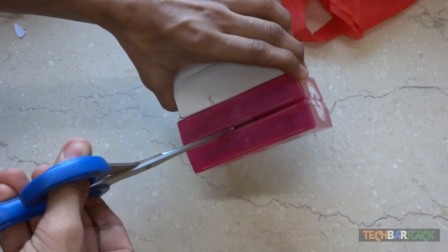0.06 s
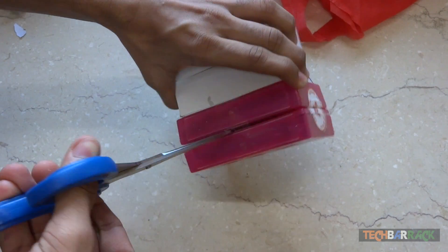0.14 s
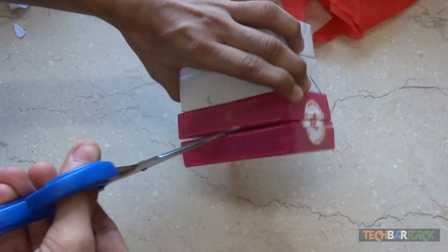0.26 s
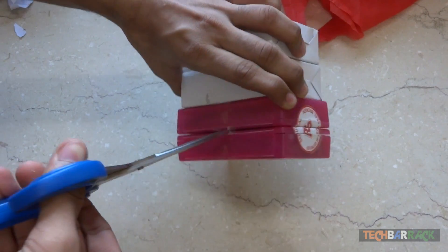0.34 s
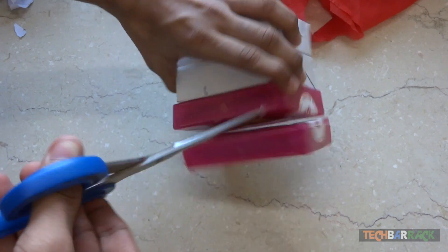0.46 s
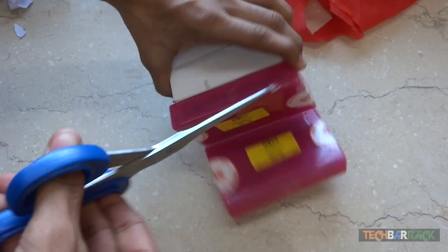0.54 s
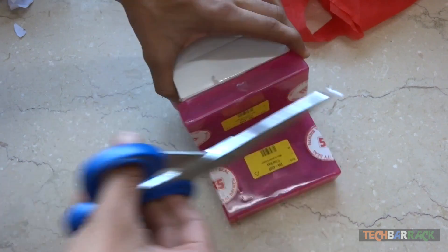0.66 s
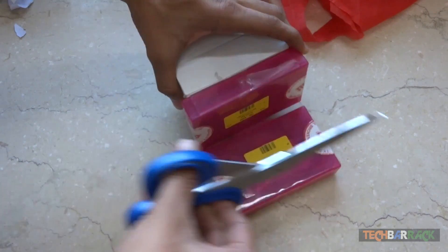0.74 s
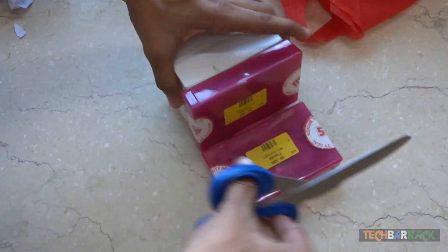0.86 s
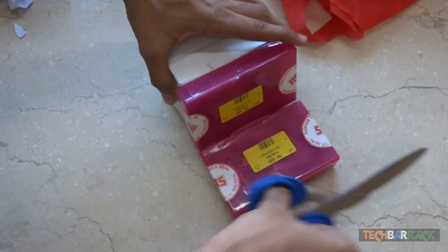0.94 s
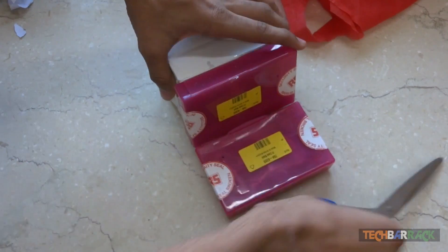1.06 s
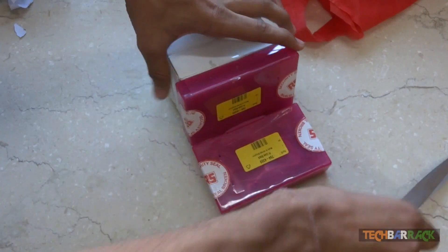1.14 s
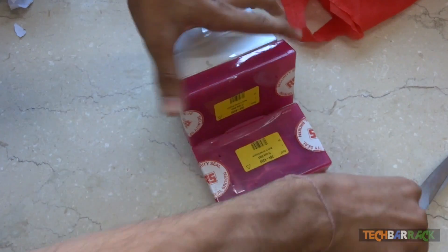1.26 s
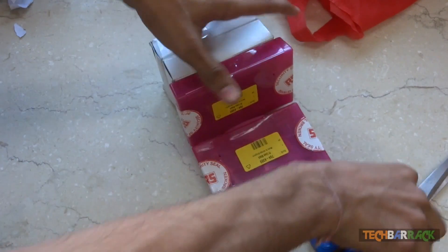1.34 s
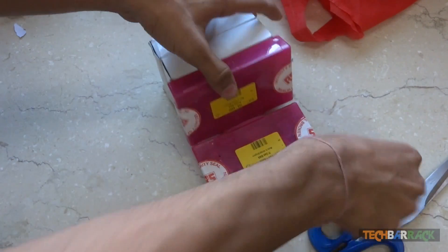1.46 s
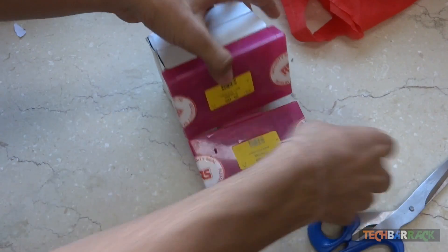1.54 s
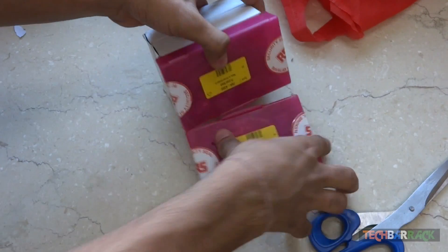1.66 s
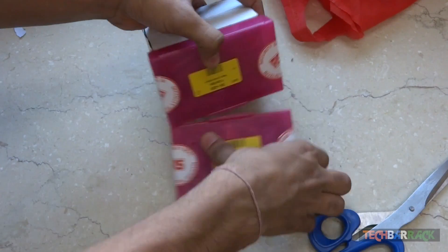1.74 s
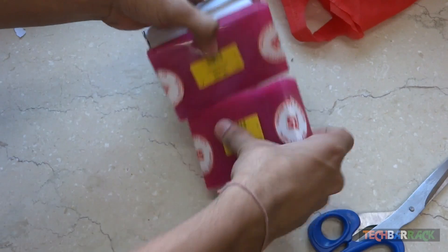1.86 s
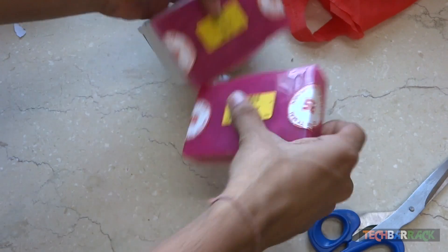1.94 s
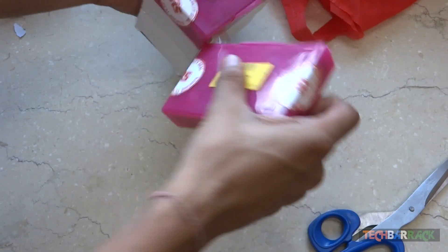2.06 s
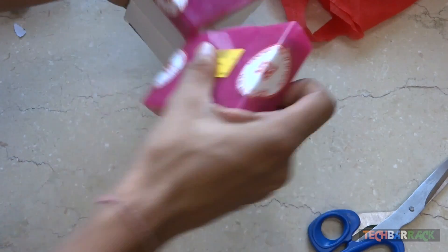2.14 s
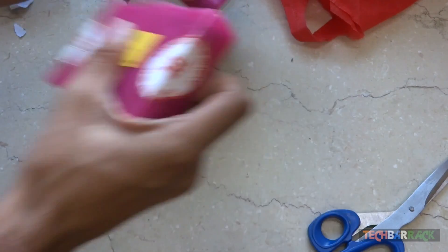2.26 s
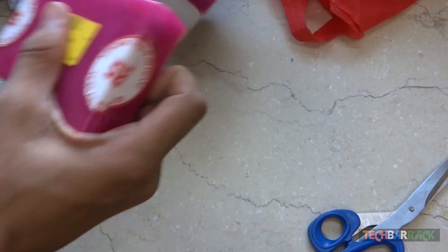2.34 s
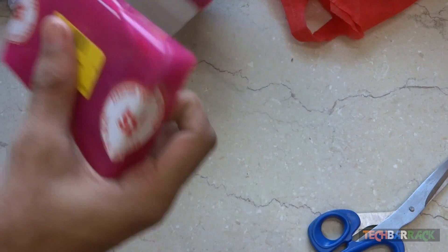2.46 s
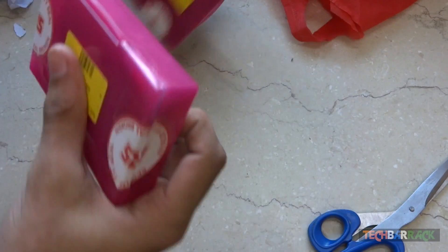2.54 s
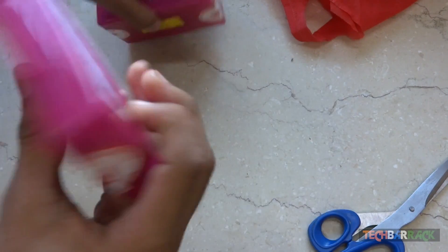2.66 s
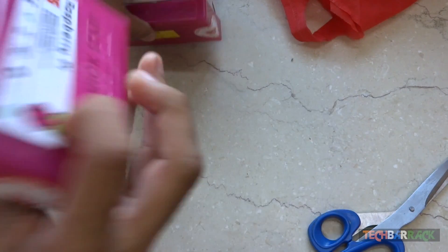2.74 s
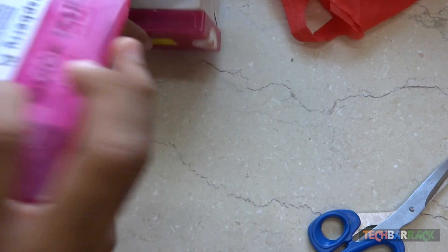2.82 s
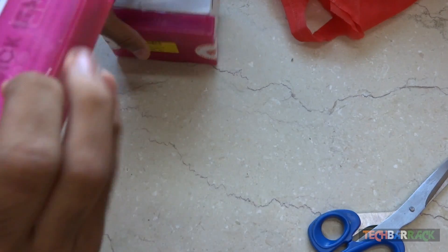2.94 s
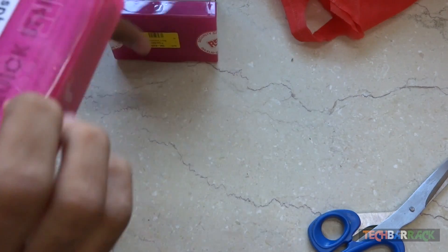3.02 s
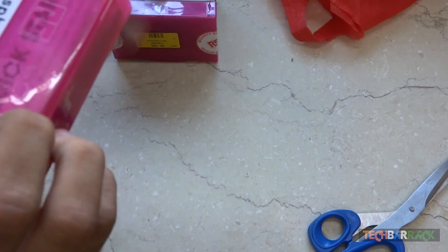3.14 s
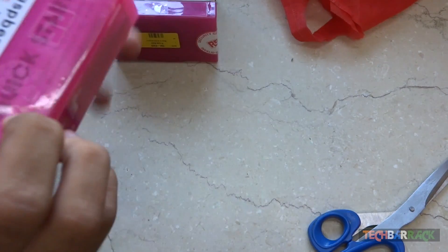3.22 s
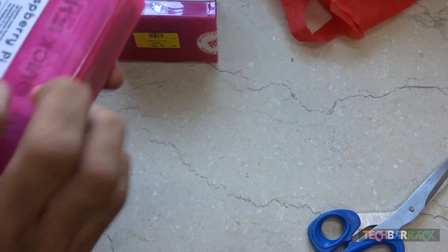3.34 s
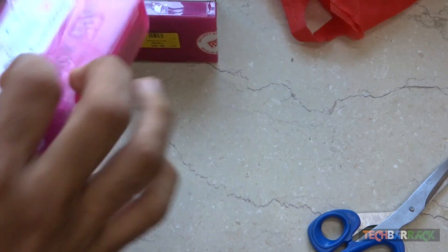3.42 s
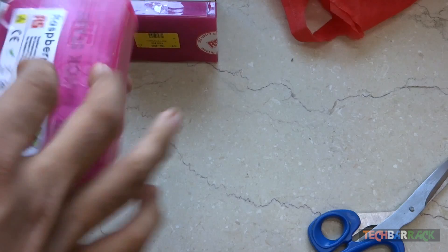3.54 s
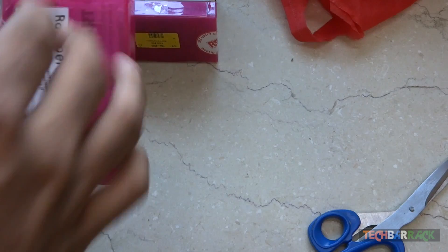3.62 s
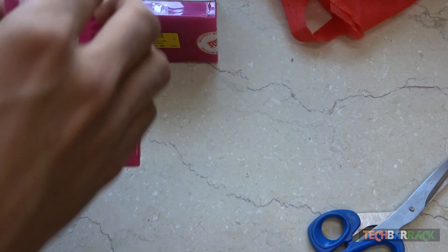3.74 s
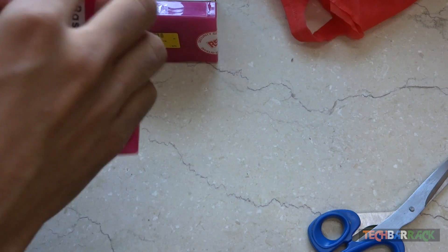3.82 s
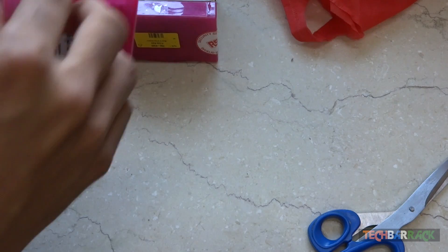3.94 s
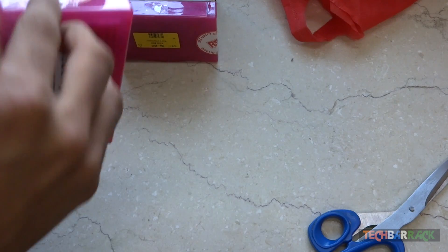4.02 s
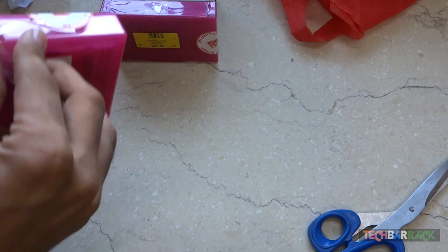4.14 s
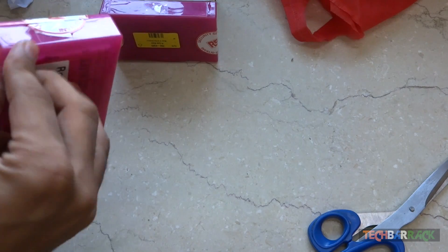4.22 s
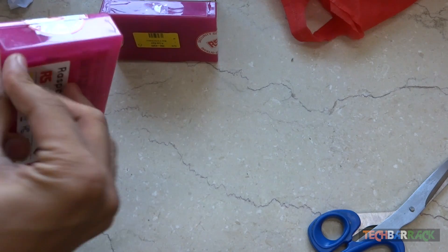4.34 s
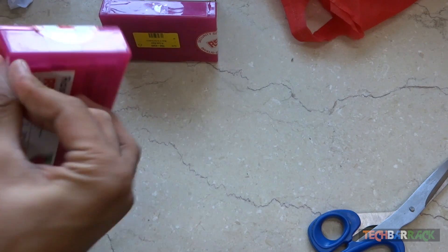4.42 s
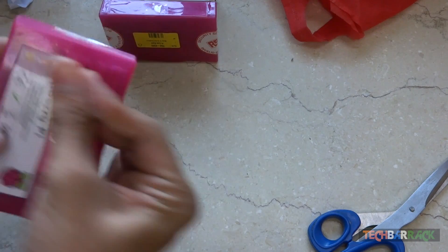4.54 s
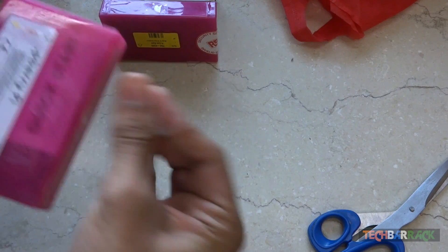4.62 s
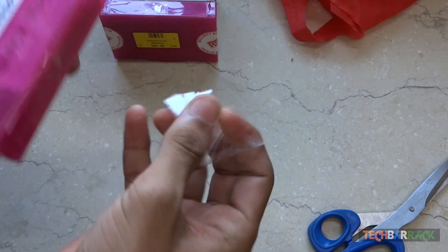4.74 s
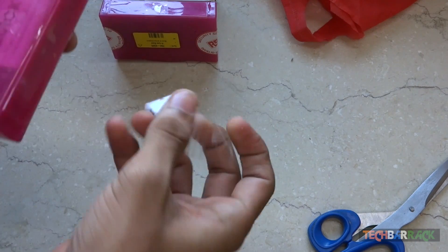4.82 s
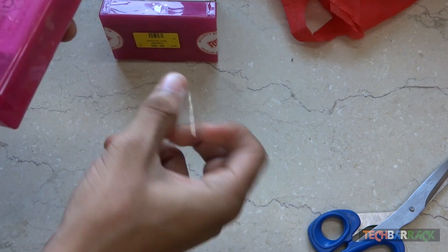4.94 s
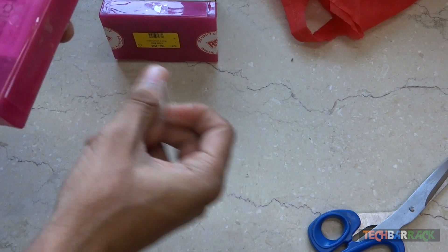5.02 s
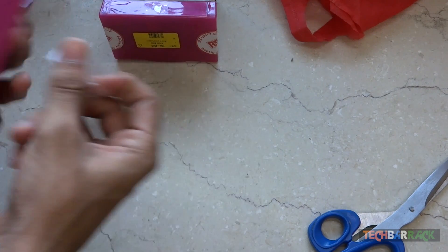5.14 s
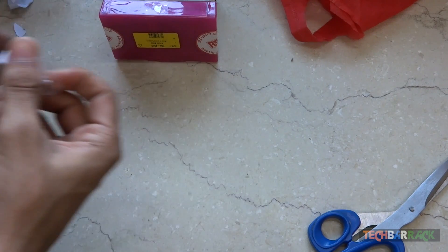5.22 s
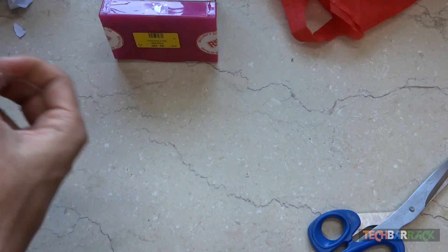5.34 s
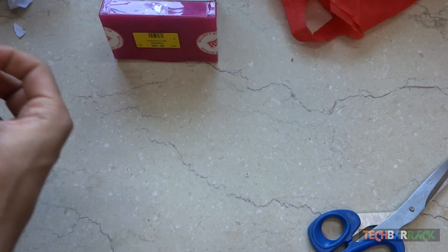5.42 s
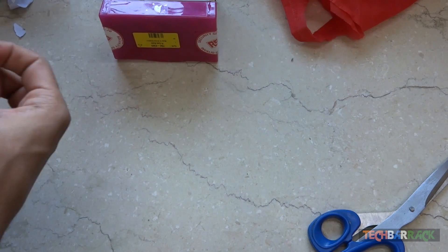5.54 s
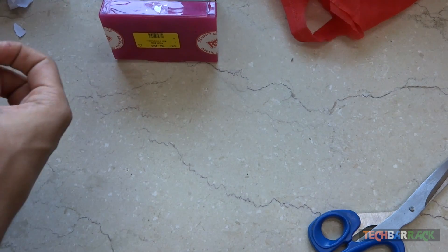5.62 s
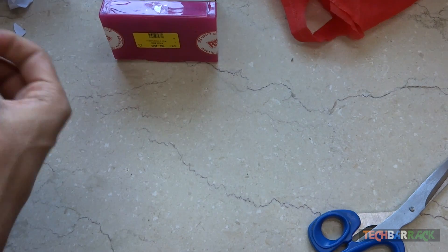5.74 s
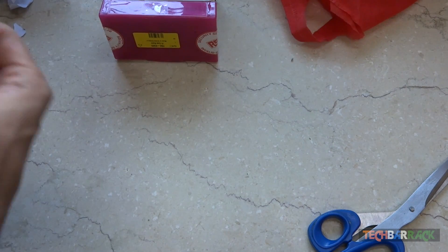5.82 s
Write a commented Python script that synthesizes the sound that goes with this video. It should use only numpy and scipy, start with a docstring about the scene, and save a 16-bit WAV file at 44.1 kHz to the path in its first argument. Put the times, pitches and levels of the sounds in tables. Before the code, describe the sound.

Light clicks and crinkles open as scissors work into tape joining two small plastic-wrapped boxes. At about 0.6 seconds the tape tears loudly, with sharp cracks and a soft thud. The scissor handles clack onto a stone floor at 1.1 seconds, and the blades skid with a short steel ring around 1.4. The boxes pull apart in two loud crackling rips at 2.0 and 2.2 seconds. Hollow knocks and sharp cracks follow between 2.7 and 3.1 as one box is set down. After a quieter moment, a sticker is picked from about 3.9 seconds, its glue releasing in a fine, soft crackle, and it rips free at 4.5. Small ticks and crinkles continue until nearly 5.9. The handling is centred in stereo, later slightly left. A small bare room adds a short echo, with a faint rough hum throughout.

```python
"""Scissors slit the tape joining two small film-wrapped boxes on a stone floor, then are laid down.
Tape and film tear in dense clicks and single cracks that knock on the hollow boxes; the steel rings as
it skids. The boxes are pulled apart, one is set down, and a sticker is picked and peeled off the other,
its glue letting go in tiny slips. On the stereo microphone the hands are central, later a little left;
a small bare room answers every crack, and a rough hum lies behind it all."""
import sys
import numpy as np
from scipy import signal
from scipy.fft import rfft, irfft
from scipy.io import wavfile

SR = 44100
rng = np.random.default_rng(int(sys.argv[2]) if len(sys.argv) > 2 else 0)


def put_to_file(sound):
    """Save the sound as 16-bit audio at rate SR, in the file named by the first command-line argument."""
    columns = np.atleast_2d(sound).T  # one column per channel
    safe = np.clip(columns, -1, 1)
    whole_steps = np.round(safe * 32767)
    wavfile.write(sys.argv[1], SR, whole_steps.astype(np.int16))


N = 258942

# spectra of the hum and of the wrapping film: f/Hz, level/dB
HUM_SPECTRUM = [(15, -85.5), (25, -53), (53, -35), (130, -17), (285, -23.5), (335, -22), (384, -9.5),
                (476, -20), (560, -11), (677, -12), (818, -1.5), (1040, -14.5), (1440, -21), (11600, -35.5),
                (16000, -37.5)]
FILM_SPECTRUM = [(710, -6), (1160, 7.5), (1430, 0.5), (2560, -5), (2760, -1.5), (3870, -4), (8910, 2.5),
                 (13600, -0.5), (16000, -10)]
# stereo width of hum and room: f/Hz, side against mid/dB
HUM_WIDTH = [(60, -22), (150, -13), (380, -5), (950, -10.5), (2380, 0.5), (5980, -13.5), (15000, -45.5)]
ROOM_WIDTH = [(60, -23), (200, -2), (600, -11.5), (1600, -7.5), (5000, -31.5), (15000, -57.5)]
# reverberation time of the room: f/Hz, T60/s
ROOM_DECAY = [(100, 0.079), (1000, 0.23), (5000, 0.21), (16000, 0.21)]
# course of the hum and of the low rumble: t/s, level/dB
HUM_COURSE = [(0.0, -51.5), (0.8, -49), (1.6, -49), (2.16, -54), (2.68, -55), (2.97, -50), (3.6, -53.5),
              (4.2, -51.5), (5.87, -50)]
RUMBLE_COURSE = [(0.0, -58.5), (1.9, -60), (2.05, -85.5), (2.7, -83.5), (2.8, -67), (3.6, -66.5),
                 (5.87, -61)]
# balance at the microphone, following the hands: t/s, left minus right/dB
BALANCE = [(0.0, 0.1), (3.2, 0), (3.998, 2.2), (4.8, 0.6), (5.87, 2)]
# thuds carried by the floor: t/s, rise/s, hold/s, level/dB
FLOOR_THUDS = [(0.295, 0.085, .01, -48.5), (0.636, 0.019, 0.12, -34), (1.114, .02, 0.034, -47),
               (1.38, 0.072, 0.14, -45), (1.845, .09, .005, -61), (2.735, 0.024, .003, -46.5),
               (2.911, 0.021, 0.0088, -45.5), (3.038, 0.018, 0.071, -42.5), (5.204, 0.15, .02, -53)]
# faint wavering tones: f/Hz, level/dB, start/s, end/s
THIN_TONES = [(400, -49, 0.956, 1.095), (2750, -54.5, 0.967, 1.112), (3220, -51, 0.963, 1.11),
              (3521, -53, 0.954, 1.107), (3200, -69, 3.249, 3.326), (2765, -66, 3.227, 3.47)]
# resonances: f/Hz, width/Hz, level/dB
BLADE_MODES = [(2050, 85, -4.5), (3700, 36, -2), (3890, 91, -1), (4770, 120, 1.5), (5880, 160, -6.5),
               (6600, 40, -9), (6950, 23, -8), (7210, 140, 4.5), (8770, 100, -15), (10650, 87, -9.5),
               (10500, 67, -4), (11700, 80, 2.5), (12000, 49, -8), (12600, 120, -4.5)]
HANDLE_MODES = [(2310, 110, -3.5), (3650, 95, 3), (4090, 66, 0), (5080, 94, -8), (6400, 130, -7),
                (7280, 90, 4), (8700, 52, -4), (11100, 160, -1), (12800, 80, -5.5)]
STICKER_MODES = [(1730, 130, 10), (2680, 160, 12), (3460, 460, 5.5), (5370, 1800, 9.5)]
TAUT_STRIP_MODES = [(2300, 180, 9.5), (4360, 350, 12), (6940, 3100, -14)]
# hollow bodies, the box and its panel under the sticker: f/Hz, width before widening/Hz, level/dB
BOX_MODES = [(398, 118, -4.5), (563.6, 36.5, 8), (713, 107, -1), (899, 33.3, 5.5), (925.4, 20, 7.5),
             (1106, 297, 0)]
PANEL_MODES = [(1110, 75, 10), (527, 330, 2)]
# strokes: t/s, rise/s, hold/s, level/dB, dull/dB, treble/dB, box/dB
# level is that of the middle range before the mix; dull, treble and box are relative to it
TEARS = [(0.0, 0.00076, .001, -47, -5.5, 8, -3), (0.636, 0.0046, 0.07, -22, 4, 1, 2),
         (0.726, 0.0013, 0.011, -24.5, 1.5, -1.5, 1), (0.943, 0.0021, 0.04, -44.5, 2.5, -5, -1),
         (1.864, 0.0022, .07, -45.5, 3, 5.5, 0), (1.986, 0.0042, 0.1, -19, -0.5, 2, -11.5),
         (2.203, 0.016, 0.066, -21.5, 0, 8.5, -18.5), (2.749, 0.00092, .003, -39, -4, -15.5, 12.5),
         (2.928, 0.0015, .01, -46.5, -8, 0, 18.5), (3.047, 0.0016, .008, -26.5, 4, -4, 8),
         (3.855, 0.0017, .002, -57, -13, -9.5, 9), (4.506, 0.0052, .018, -51.5, -9, -5, 9)]   # tape and film tearing, box landing
FILM_RUSTLES = [(0.34, .038, .003, -39.5, -23, 0.5, 7), (0.41, .03, 0.02, -55, -6, 10, 9.5),
                (1.03, 0.017, 0.044, -54.5, 9.5, -6, -8), (1.62, 0.17, 0.01, -48, 4, -4, -6),
                (1.825, .01, 0.028, -60, 7, 16, -10), (1.95, .035, .003, -40.5, -8, 14, -7),
                (2.15, 0.054, .003, -34.5, -4, 8, -12), (2.95, 0.026, 0.2, -50.5, -0.5, -12, -6),
                (3.53, .03, .03, -64.5, 10, 4, 4), (4.35, .02, 0.054, -58, 12, 9, 17.5),
                (4.44, 0.083, .003, -55.5, 13, 19, 15), (4.73, 0.0086, 0.0043, -40, -18, -4, -30),
                (5.19, 0.021, .003, -51, 2, 0, 9), (5.245, 0.011, 0.0064, -44, 1, 3, -7),
                (5.265, 0.011, 0.13, -61.5, 12, 7.5, 13.5), (5.518, .004, 0.047, -54, -5, 7, 2),
                (5.62, 0.0035, 0.024, -57, -3, -1, 7)]
HANDLE_TOUCH = [(1.116, 0.00069, 0.071, -33.5, 8, 9, -1)]
BLADE_SKID = [(1.383, 0.0044, 0.13, -19, -4, 1, -6)]
STICKER_RIP = [(4.543, 0.015, .05, -22, 0.4, 6.3, -11.5)]
# glue letting go: the stroke columns, then slip rate/Hz, share of distinct slips/0-1
GLUE_PEEL = [(4.005, 0.031, 0.068, -47.5, 5, -2, 2, 320, 0.3),
             (4.085, .05, .052, -39, 2.5, -7, 1.5, 270, 0.76),
             (4.2, 0.047, 0.011, -48.5, 0, -2, -7, 325, 0.97),
             (4.262, 0.002, 0.077, -39.5, -2.5, 2, 9.5, 310, 0.03)]
# single snaps and knocks: t/s, level before the mix/dB, relative treble/dB, relative box/dB
CRACKS = [(0.163, -29, -10, -14), (0.231, -30, -6, -16), (0.2568, -27.5, -14, -12),
          (0.3012, -28.5, -7, -15), (0.374, -21, 4, -4.5), (0.4344, -31.5, 15.5, -21),
          (0.636, -6.5, -16, -8), (0.7285, 0, -16, -10), (0.9044, -15, -22, -15.5), (0.952, -39, -7, 17.5),
          (0.971, -15, -8, -22), (1.1183, -1.5, 3, -17.5), (1.214, -43, -15, 19.5), (1.374, -17.5, -5, -24),
          (1.3836, -5.5, 10.5, -30), (1.499, -4, 7, -9.5), (1.5661, -17.5, -20, 1.5),
          (1.8188, -21.5, 7.5, -30), (1.863, -19, 17, -22), (1.9248, -27, -17, 4), (1.9884, 2.5, -7, -55),
          (2.2071, 2, 2.5, -40), (2.212, -5.5, -0.5, -40.5), (2.75, -9, -6, -3), (2.765, -33, -12, 9),
          (2.87, -32, 3, -17), (2.9287, -28.5, -1, 13), (3.049, 1, -15, -6.5), (3.069, -21, -14.5, -2),
          (3.352, -54.5, -12.5, 22), (3.3957, -39, -5.5, -11), (3.456, -31.5, 0, -13),
          (3.857, -17, -4.5, -5), (3.939, -31, -5, -20), (4.188, -33.5, 12.5, -29), (4.2644, -28, -14, -11),
          (4.33, -17.5, 6.5, -2), (4.506, -22, -10, 10), (4.5458, -20, 21, -30), (4.738, -22, 6, -27),
          (4.7482, -15.5, 0, -28), (4.7572, -15.5, 0, -32), (4.8247, -24, -7, -22), (4.8438, -30, 5, -8),
          (5.097, -14.5, -13, -28), (5.2588, -28, -8, -6), (5.2982, -27, -5, -5), (5.4984, -57.5, -8, 28.5),
          (5.521, -27.5, 14, -16), (5.54, -36, 6, -16), (5.576, -19.5, 0, -18), (5.624, -20.5, -6, -29),
          (5.641, -29, -8, -18), (5.678, -21, -6, -42), (5.733, -38, 5, -20), (5.8573, -39.5, 24, -19)]

RISE_DB, SAG_DB_PER_S = 20.5, 51
BURST_FALL_DB_PER_S, RUSTLE_FALL_DB_PER_S, PEEL_FALL_DB_PER_S = 233.5, 335.5, 493.5
LINGER_SHARES = (0.092, -.05, 0.12)   # share of the fall that dull, treble and box are spared
TIME = np.arange(N) / SR


def from_db(db):
    """Gain of a level."""
    return 10 ** (np.asarray(db) / 20)


def rms_one(x):
    """Scale to unit power."""
    return x / np.sqrt(np.mean(x ** 2) + 1e-20)


def at_hz(points, hz):
    """Read a curve on a log frequency axis."""
    points = np.array(points)
    return np.interp(np.log(np.maximum(hz, 1)), np.log(points[:, 0]), points[:, 1])


def cut(x, hz, kind, order=2):
    """Butterworth filter."""
    return signal.sosfilt(signal.butter(order, hz, kind, fs=SR, output="sos"), x)


def coloured(x, spectrum):
    """Give a signal a spectrum, with minimum phase so that nothing sounds early."""
    gains = from_db(at_hz(spectrum, np.linspace(0, SR / 2, 2049)))
    cepstrum = irfft(np.log(gains))
    cepstrum[1:2048] *= 2
    cepstrum[2049:] = 0
    return signal.fftconvolve(x, irfft(np.exp(rfft(cepstrum))))[:N]


def resonate(x, modes, widen=1):
    """Parallel resonances with alternating signs."""
    out = 0
    for k, (hz, width, db) in enumerate(modes):
        r = np.exp(-np.pi * width * widen / SR)
        poles = [1, -2 * r * np.cos(2 * np.pi * hz / SR), r * r]
        out += (-1) ** k * from_db(db) * signal.lfilter([1 - r * r, 0, r * r - 1], poles, x + 1e-18)
    return out


def grains(per_s, spread_db=2.3):
    """Random clicks of uneven size."""
    sizes = from_db(spread_db * np.minimum(rng.exponential(1, N), 4)) * rng.choice([-1, 1], N)
    return sizes * (rng.random(N) < per_s / SR)


def envelope(start, rise, hold, peak_db, fall_db_per_s):
    """A stroke rises, sags while held, then falls 50 dB: its samples, level and fall so far."""
    end = start + rise + hold + 50 / fall_db_per_s
    at = np.arange(round(start * SR), min(N, round(end * SR)))
    age = at / SR - start - rise
    held_db = peak_db + RISE_DB * np.minimum(age, 0) / rise - SAG_DB_PER_S * np.clip(age, 0, hold)
    fallen_db = fall_db_per_s * np.maximum(age - hold, 0)
    return at, held_db - fallen_db, fallen_db


def strokes(*kinds):
    """Level and later columns over time; where strokes overlap, the stronger sets the tone."""
    first_row = kinds[0][0][0]
    power, columns = np.full(N, 1e-20), np.zeros((len(first_row) - 4, N))
    for rows, fall_db_per_s in kinds:
        for row in rows:
            at, db, fallen_db = envelope(*row[:4], fall_db_per_s)
            weight = from_db(2 * db)
            power[at] += weight
            columns[:, at] += weight * np.array(row[4:])[:, None]
            columns[:3, at] += weight * np.outer(LINGER_SHARES, fallen_db)
    return 10 * np.log10(power), *(columns / power)


def voices(clicks, modes=BLADE_MODES, modes_db=-60, body=BOX_MODES):
    """Clicks heard in three ranges of the film, with the modes it touches, and through a hollow body."""
    film = rms_one(coloured(clicks, FILM_SPECTRUM))
    film += from_db(modes_db) * rms_one(resonate(clicks, modes))
    dull = -cut(film, [1500, 3500], "band")   # opposite signs join the ranges without a dip
    middle = cut(film, [3500, 7000], "band")
    treble = -cut(film, 7000, "high", order=3)
    box = rms_one(resonate(clicks, body, widen=1.34)) + .5 * rms_one(cut(clicks, [300, 1500], "band"))
    return dull, middle, treble, cut(box, 317, "high", order=4)


def mix(parts, dull_db, treble_db, box_db):
    """Sum the four voices, relative to the middle one."""
    dull, middle, treble, box = parts
    return from_db(dull_db) * dull + middle + from_db(treble_db) * treble + from_db(box_db) * box


def played(clicks, level_db, *parts_db, **sounding):
    """A stream of clicks takes the level and tone of a gesture."""
    return from_db(level_db) * mix(map(rms_one, voices(clicks, **sounding)), *parts_db)


def hum():
    """Room tone, mid and side: coloured noise that throbs slightly."""
    mid, side = (coloured(noise, HUM_SPECTRUM) for noise in rng.standard_normal((2, N)))
    band_rms = np.sqrt(np.mean(cut(mid, [600, 1100], "band", order=4) ** 2))
    throb_db = 0.5 * rms_one(cut(rng.standard_normal(N), 30, "low"))
    level_db = np.interp(TIME, *np.transpose(HUM_COURSE)) + throb_db
    return from_db(level_db) * np.array([mid, coloured(side, HUM_WIDTH)]) / band_rms


def room(x, first_wall_s=.003):
    """Echoes off near, bare walls, mid and side: octaves of noise, each dying at its own rate."""
    age = np.arange(SR // 2) / SR
    tail = 0
    for low_hz in 80 * 2. ** np.arange(8):
        noise = cut(rng.standard_normal((2, len(age))), [low_hz, min(2 * low_hz, .45 * SR)], "band")
        tail += noise * from_db(-60 * age / at_hz(ROOM_DECAY, 1.7 * low_hz))
    tail *= age > first_wall_s
    mid, side = signal.fftconvolve(x[None], tail / np.linalg.norm(tail[0]), axes=1)[:, :N]
    return np.array([mid, coloured(side, ROOM_WIDTH)])


def floor_rumble(deep_db=-11):
    """Low noise under the handling, swelling at each thud the floor carries."""
    power = from_db(2 * np.interp(TIME, *np.transpose(RUMBLE_COURSE)))
    for thud in FLOOR_THUDS:
        at, db, _ = envelope(*thud, fall_db_per_s=147.5)
        power[at] += from_db(2 * db)
    low = rms_one(cut(rng.standard_normal(N), [180, 420], "band"))
    deep = rms_one(cut(rng.standard_normal(N), [65, 170], "band"))
    return np.sqrt(power) * rms_one(low + from_db(deep_db) * deep)


def whistles(waver_hz=25, waver_db=3, fade_s=0.0091):
    """Faint thin tones, unsteady in pitch and level."""
    out = 0
    for hz, db, start, end in THIN_TONES:
        swell = np.clip(np.minimum(TIME - start, end - TIME) / fade_s, 0, 1)
        pitch_drift, level_drift = map(rms_one, cut(rng.standard_normal((2, N)), 60, "low"))
        phase = 2 * np.pi * np.cumsum(hz + waver_hz * pitch_drift) / SR
        out += np.sqrt(2) * from_db(db + waver_db * level_drift) * swell * np.sin(phase)
    return out


def sticker_peel():
    """Glue lets go in unevenly timed slips, with fine crackle between, over a hollow panel."""
    *levels_db, per_s, share = strokes((GLUE_PEEL, PEEL_FALL_DB_PER_S))
    uneven = 0.094 * rms_one(cut(rng.standard_normal(N), 120, "low"))
    slip_count = np.floor(np.cumsum(per_s * np.exp(uneven) / SR))
    slips = np.diff(slip_count, prepend=0) * from_db(rng.normal(0, 2.5, N))
    slips *= np.sqrt(SR / np.maximum(per_s, 1))   # same power at any rate
    share = np.clip(share, 0, 1)
    clicks = share * slips + np.sqrt(1 - share ** 2) * rms_one(grains(8000, spread_db=2.9))
    return played(clicks, *levels_db, modes=STICKER_MODES, modes_db=5, body=PANEL_MODES)


def sticker_rip():
    """The sticker comes off in one burst of clicks that ring the taut strip."""
    gesture = strokes((STICKER_RIP, BURST_FALL_DB_PER_S))
    return played(grains(per_s=3200), *gesture, modes=TAUT_STRIP_MODES, modes_db=-6.5)


def scissors_laid_down():
    """The handles touch the stone, then the blades skid; each rings with its own modes."""
    skid = strokes((BLADE_SKID, BURST_FALL_DB_PER_S))
    touch = strokes((HANDLE_TOUCH, BURST_FALL_DB_PER_S))
    blades = played(grains(per_s=7000), *skid, modes_db=-4.5)
    handles = played(grains(per_s=4000, spread_db=5.1), *touch, modes=HANDLE_MODES, modes_db=-1.5)
    return blades + handles


def snaps(splinter_size=0.5, splinter_s=0.0028, hand_damping_s=0.014):
    """Each snap is a sharp click with splinters behind it, and a knock on the hand-damped box."""
    length, burst_length = 2000, 600   # samples
    age = np.arange(length) / SR
    bursts = splinter_size * rng.standard_normal((len(CRACKS), burst_length))
    bursts *= np.exp(-age[:burst_length] / splinter_s)
    bursts[:, 0] = 1   # the leading click
    damping = np.exp(-age / hand_damping_s)
    *film, box = [voice[:length] / abs(voice).max() * damping for voice in voices(signal.unit_impulse(N))]
    out = np.zeros(N + length + burst_length)
    for (start, db, treble_db, box_db), burst in zip(CRACKS, bursts):
        dull_db = -3 + .4 * box_db   # knocks with more box in them are also duller
        crack = mix([*film, 0], dull_db, treble_db, box_db)
        snap = signal.fftconvolve(burst / np.linalg.norm(burst), crack)
        snap[:length] += from_db(box_db) * box
        at = round(start * SR)
        out[at:at + len(snap)] += from_db(db) * snap
    return out[:N]


def tape_and_film():
    """Tape and film tear and rustle in dense clicks; gentle handling crackles more sparsely."""
    level_db, *parts_db = strokes((TEARS, BURST_FALL_DB_PER_S), (FILM_RUSTLES, RUSTLE_FALL_DB_PER_S))
    per_s = np.clip(6000 * from_db(.4 * (level_db + 22)), 1500, 6000)
    return played(grains(per_s) / np.sqrt(per_s), level_db, *parts_db)


def scene():
    """At the microphone: direct sound in front, room and hum behind; mid and side become left and right."""
    rubbed = tape_and_film() + sticker_peel() + scissors_laid_down() + sticker_rip()
    rubbed = cut(rubbed, 160, "high", order=3)   # the handling sounds are cut below 160 Hz
    struck = snaps()
    direct = from_db(-4.0) * rubbed + from_db(-4.5) * struck + whistles() + floor_rumble()
    mid, side = room(from_db(-13.5) * rubbed + from_db(-10) * struck) + hum()
    pan_db = np.interp(TIME, *np.transpose(BALANCE))
    return np.array([direct + mid + side, direct + mid - side]) * from_db([pan_db / 2, -pan_db / 2])


def record(dry, ceiling=.9, cutoff_hz=16200):
    """The recorder rounds the peaks and cuts the top steeply."""
    rounded = ceiling * np.tanh(dry / ceiling)
    return signal.sosfilt(signal.cheby2(20, 50, cutoff_hz, fs=SR, output="sos"), rounded)


dry = scene()
out = record(dry)
put_to_file(out)
```